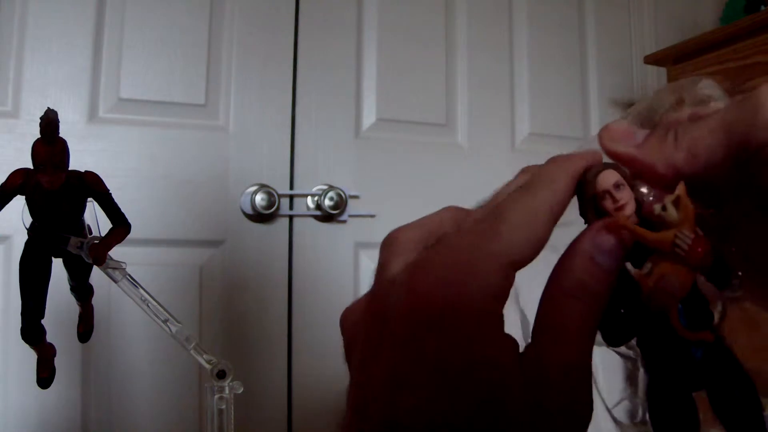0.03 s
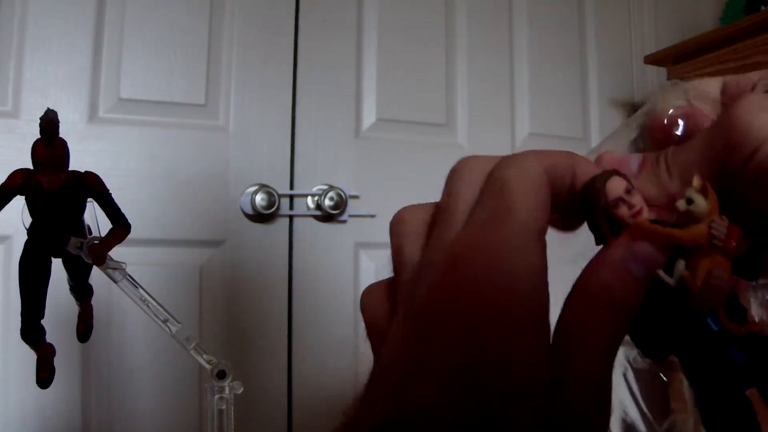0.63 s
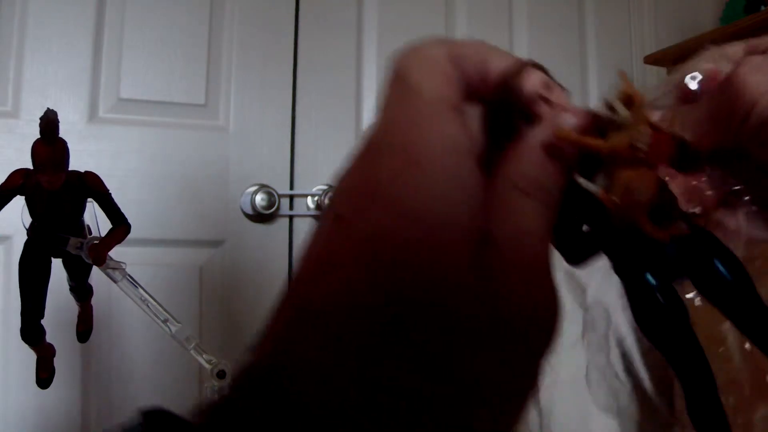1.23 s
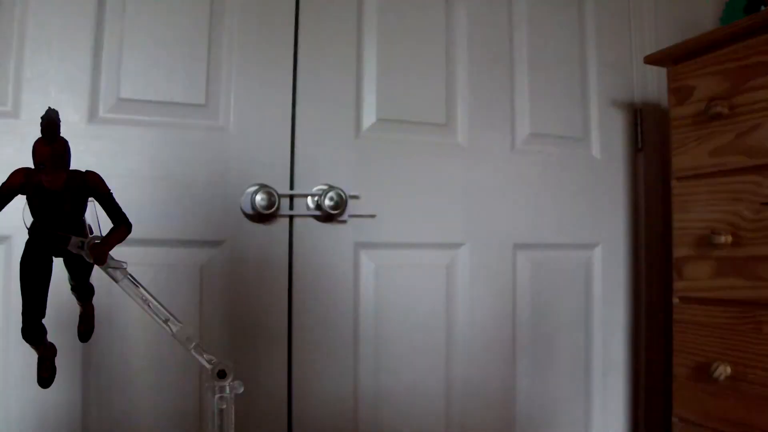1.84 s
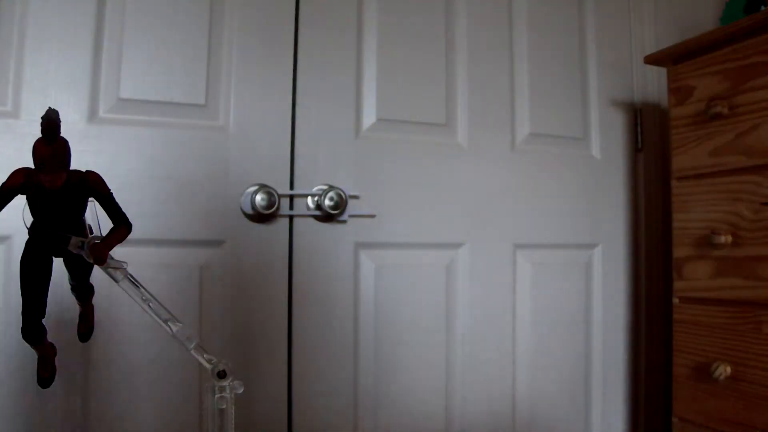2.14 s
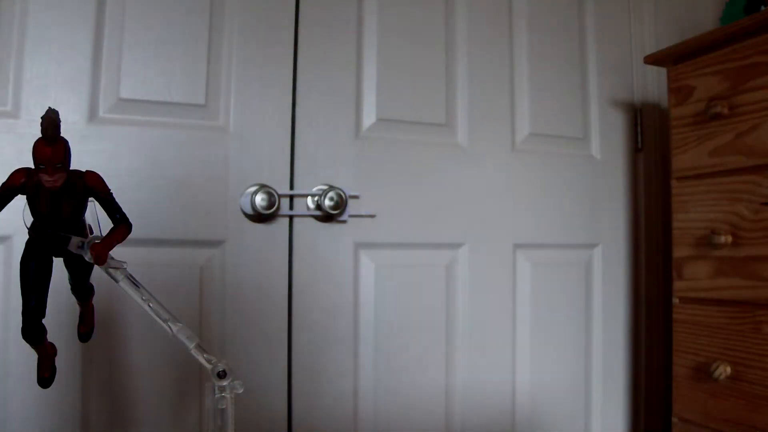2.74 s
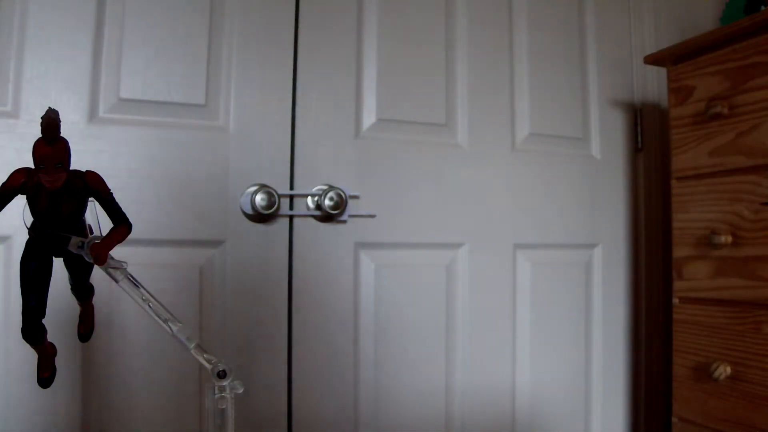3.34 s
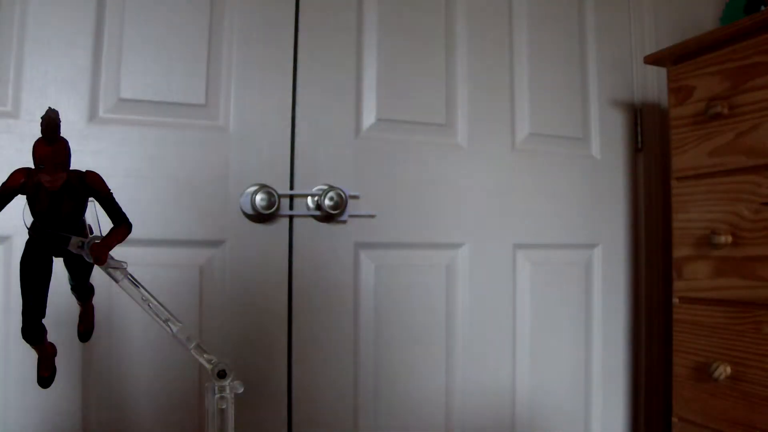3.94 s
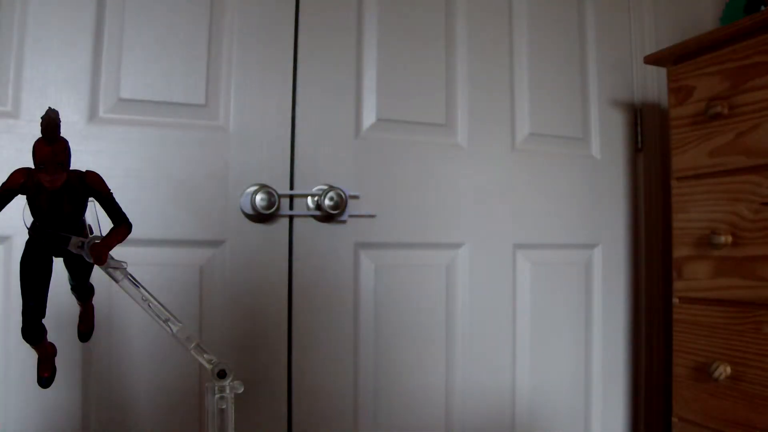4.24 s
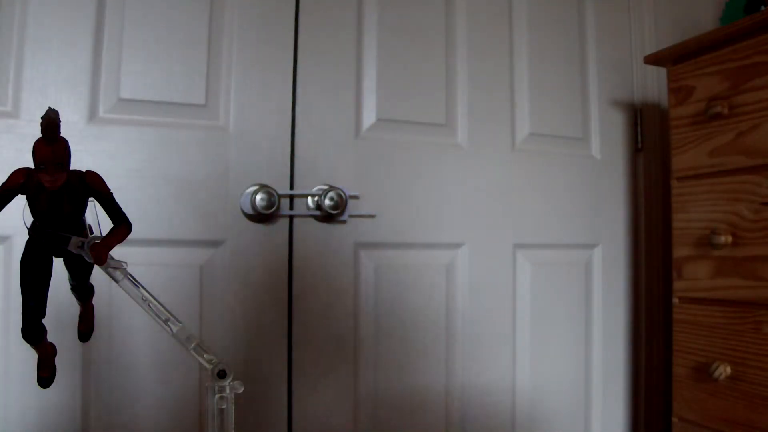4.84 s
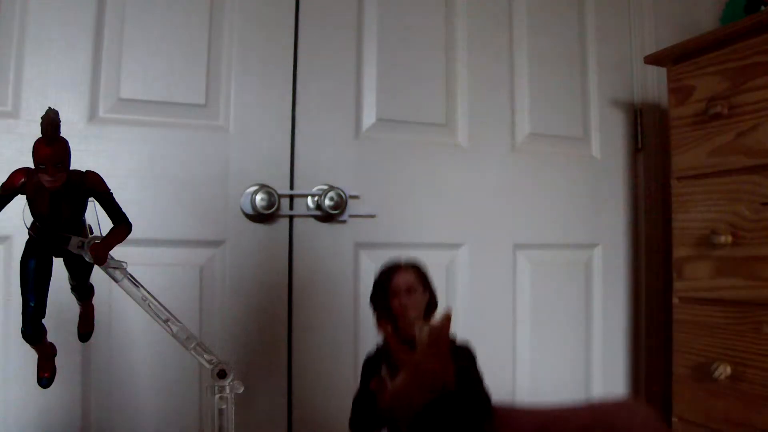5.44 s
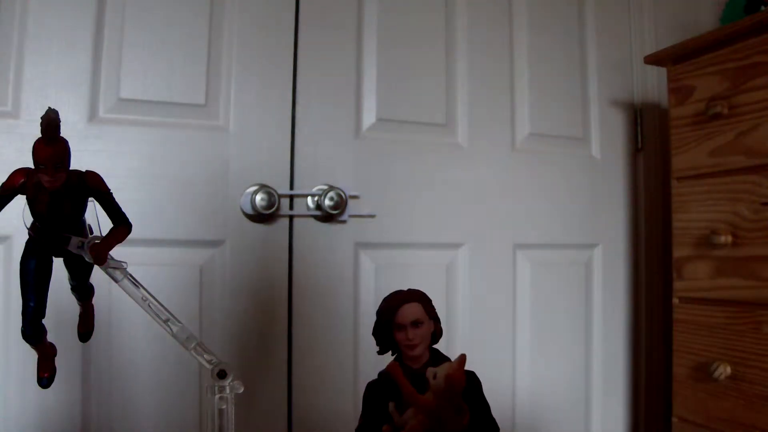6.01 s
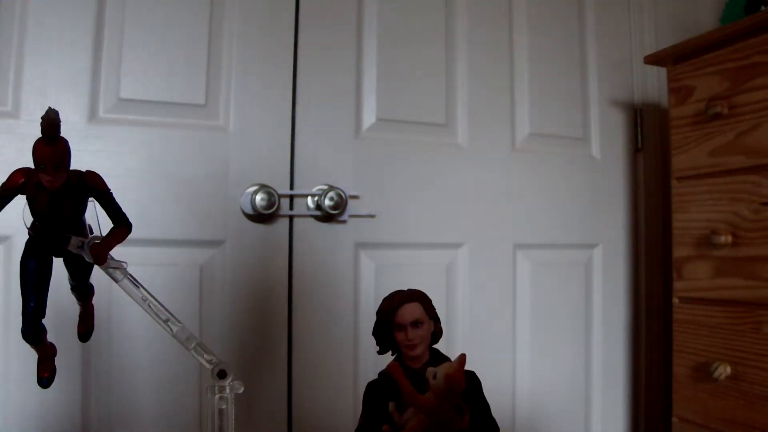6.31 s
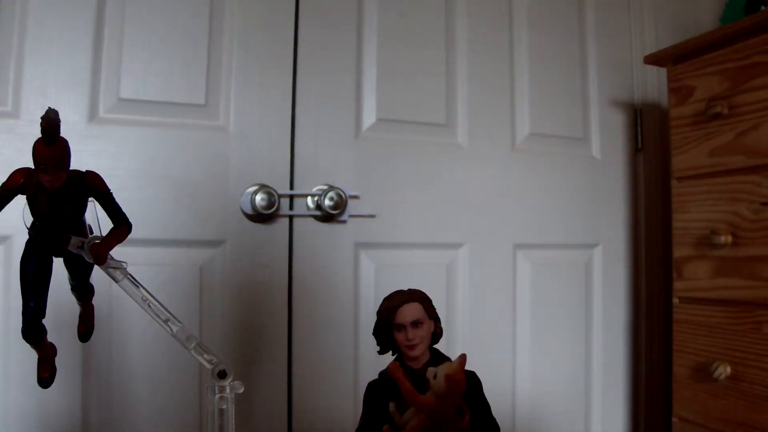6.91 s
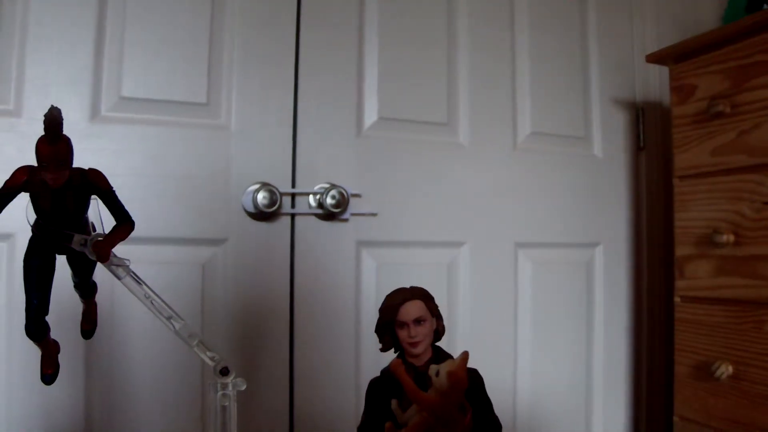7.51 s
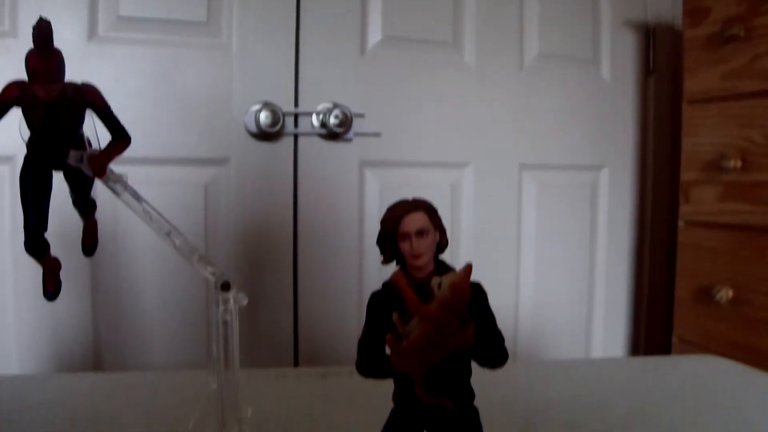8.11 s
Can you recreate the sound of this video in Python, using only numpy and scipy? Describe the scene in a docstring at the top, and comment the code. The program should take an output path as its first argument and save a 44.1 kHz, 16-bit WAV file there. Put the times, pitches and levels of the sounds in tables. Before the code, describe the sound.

In a quiet room, close handling of stiff plastic packaging makes sharp pops, crackles and rubbing that grow louder as a toy is pulled free. The empty tray pops back a few times, then drops with a brief, light clatter further away. A lull with faint hiss follows, until the toy is set on a table with one knock and settles with very soft clicks.

```python
"""A stiff plastic blister tray snaps and crinkles close by as hands work a toy figure out of it.
Each buckle launches a bending wave; dispersion brings the treble first, so it is heard as a very quick
falling chirp. The empty tray pops back a few times and clatters down further off in the quiet room.
The figure is then stood on a table with a knock, squeaks once and rocks on its feet."""
import sys
import numpy as np
from scipy import signal
from scipy.fft import rfft, irfft, next_fast_len
from scipy.io import wavfile
from scipy.ndimage import map_coordinates

SR = 44100
rng = np.random.default_rng(int(sys.argv[2]) if len(sys.argv) > 2 else 0)


def put_to_file(sound):
    """Save the sound as 16-bit audio at rate SR, in the file named by the first command-line argument."""
    columns = np.atleast_2d(sound).T  # one column per channel
    safe = np.clip(columns, -1, 1)
    whole_steps = np.round(safe * 32767)
    wavfile.write(sys.argv[1], SR, whole_steps.astype(np.int16))


N = 359856


def amp(db):
    """Amplitude ratio of a level in decibels."""
    return 10 ** (np.asarray(db) / 20)


def along(points, hz):
    """Interpolation of (Hz, value) points on a logarithmic frequency axis."""
    f, v = np.transpose(points)
    return np.interp(np.log(hz + 1), np.log(f + 1), v)


def causal(db):
    """Minimum-phase response for levels on an FFT grid, by folding the cepstrum."""
    cepstrum = irfft(np.log(amp(db) + 1e-6))
    half = len(cepstrum) // 2
    cepstrum[1:half] *= 2
    cepstrum[half + 1:] = 0
    return np.exp(rfft(cepstrum))


def add(track, s, x):
    """Superposition: x joins the track at s seconds."""
    i = int(np.clip(round(s * SR), 0, N - 1))
    track[i:i + len(x)] += x[:N - i]


def noise(spectrum):
    """White noise filtered to a spectrum of (Hz, dB) points, at rms 1."""
    gain = amp(along(spectrum, np.fft.rfftfreq(N, 1 / SR)))
    x = irfft(rfft(rng.standard_normal(N)) * gain, N)
    return x / np.sqrt(np.mean(x ** 2) + 1e-20)


def in_room(x, room_db, scatter=0, scatter_t60=.012, direct_db=0, build_s=0.0052):
    """Direct sound, early scattering from ribs and edges, and diffuse reverberation."""
    # Each row: frequency in Hz, level of the slightly boomy room in dB.
    colour = [(80, -3), (200, 3.5), (300, -0.5), (450, 0.5), (1000, 0), (5000, -1.5), (9000, 0.5),
              (14000, -4)]
    # Each row: frequency in Hz, reverberation time in seconds.
    decay = [(150, 0.41), (400, 0.36), (1000, .3), (3000, .33), (7500, 0.33), (14000, 0.26)]
    hz, t, spectra = signal.stft(rng.standard_normal(SR * 2 // 3), SR, nperseg=256)
    tail_db = along(colour, hz)[:, None] - 60 * t / along(decay, hz)[:, None]
    tail = signal.istft(spectra * amp(tail_db), SR, nperseg=256)[1]
    t = np.arange(len(tail)) / SR
    tail *= 1 - np.exp(-t / build_s)
    near = rng.standard_normal(len(t)) * amp(-60 * t / scatter_t60)
    near *= scatter / np.linalg.norm(near)
    near[0] += 1  # the direct path
    response = amp(direct_db) * near / np.linalg.norm(near) + amp(room_db) * tail / np.linalg.norm(tail)
    return signal.fftconvolve(x, response)


def strain(t, build_db_per_s=105, relax_db_per_s=79.5):
    """Loading and relaxation: the sheet's strain, in dB, builds to each swell and falls after it."""
    # Each row: time in seconds and level in dB of a swell in the crinkling and rubbing.
    # The first is a pop dying away as the sound opens; the rest are tugs of the fingers.
    swells = [(0,7.5), (.13,-6), (0.611,-2.5), (0.758,0.5), (.89,-2), (1.09,-2), (1.28,7), (1.46,11)]
    return np.max([db - np.maximum(build_db_per_s * (s - t), relax_db_per_s * (t - s))
                   for s, db in swells], axis=0)


def jolt(s, slack_db=-28):
    """Coupling, as bass in dB: a taut sheet jolts the whole tray, a slack one sounds thin."""
    return 0.21 * max(strain(s), slack_db)


def bending(hz, sweep, knee_hz=2500, piston_hz=550):
    """Dispersion: lower bending waves arrive later, but in the bass the sheet moves as one piston."""
    slowness = 1 / np.sqrt(1 + hz / knee_hz) - 1 / np.sqrt(1 + SR / 2 / knee_hz)
    delay = sweep * slowness * hz ** 2 / (hz ** 2 + piston_hz ** 2)
    return np.exp(-2j * np.pi * np.cumsum(delay) * hz[1])


def snap(db, tilt, sweep, bass_db=0, panel_hz=1000, panel_db=-99, size=4096):
    """Impulse response of the sheet: a falling chirp that swells at two well damped panel modes."""
    # Each row: frequency in Hz, level in dB common to all snaps.
    spectrum = [(40,-20), (150,-3.5), (300,-1.5), (500,0), (780,-1.5), (1000,0), (3000,1.5), (9000,-3),
                (14000,-16.5)]
    # Each row: frequency in Hz, share of bass_db that applies there.
    jolt_share = [(300,0.96), (1000,0.025)]
    hz = np.fft.rfftfreq(size, 1 / SR)
    octaves = np.log2(np.clip(hz, 850, 9000) / 3000)  # the tilt pivots about 3 kHz
    sheet = amp(along(spectrum, hz) + tilt * octaves + bass_db * along(jolt_share, hz))
    lowest, overtone = (1 / (1 + (np.log((hz + 1) / centre) / .15) ** 2)
                        for centre in (panel_hz, 1.75 * panel_hz))
    panel = amp(panel_db) * (lowest + amp(-9) * overtone)
    response = causal(20 * np.log10(np.hypot(sheet, panel))) * bending(hz, sweep)
    return amp(db) * irfft(response)[:size // 2]


def pops():
    """Snap-through buckling sets a whole panel of the tray ringing for a few cycles."""
    # Each row: start in seconds, strength in dB, tilt in dB per octave, panel mode in Hz,
    # its level in dB relative to the strength, reverberation in dB.
    buckles = [(0.001,5.5,0.4,1680,9.5,3), (0.208,-1,-7,990,7.5,-9.5), (0.4125,14,0.2,2153,4,-5),
               (0.428,12,-3,577,10,-10.5), (0.495,2,-4,2200,14.5,-12.5), (0.572,-11,-5,1880,21.5,-11.5),
               (0.8494,5.5,-2,610,7,-5.5), (1.0315,4.5,-3.5,560,8.5,-7.5), (1.062,6.5,-2.9,514,12,-16),
               (1.0721,2,1,4200,9.5,-14), (1.228,13.5,0.5,1900,7,-6.5), (1.242,19.5,-1,2040,7,-10),
               (1.296,18.5,-1,2030,9.5,-12), (1.4211,14,0.04,640,4.5,-4), (1.443,6.5,-6.5,560,19.5,-12.5),
               (1.5809,11,-6,453,17,-10), (1.767,-2.5,-3,997,12.5,-8.5), (1.8219,9,0,1800,6,-7.5),
               (1.9003,16,-1.9,890,9,-9.5), (2.1088,-16.5,-9.5,1110,17,-8.5), (2.3664,9.5,-0.8,1603,13,-5),
               (2.9283,7.5,0.5,3630,7.5,-3), (2.954,1,-4,1000,5,1)]
    out = np.zeros(N)
    for s, db, tilt, panel_hz, panel_db, room_db in buckles:
        pop = snap(db, tilt, sweep=.009, bass_db=jolt(s), panel_hz=panel_hz, panel_db=panel_db)
        add(out, s, in_room(pop, room_db, scatter=2.1, scatter_t60=0.022))
    return out


def crinkle(count=240, span_s=2.2, size=2048):
    """Acoustic emission: the sheet gives many tiny snaps, louder under greater strain."""
    out, hz = np.zeros(N), np.fft.rfftfreq(size, 1 / SR)
    for place, strength, bright, path in rng.random((count, 4)):
        s = place * span_s
        colour = [(100, -13.5), (500, -2.5), (2000, -8 + 8 * bright),
                  (8000, -22 + 20 * bright), (14000, -36 + 22 * bright)]
        echoes = rng.standard_normal(size) * amp(-60 * np.arange(size) / SR / 0.018)
        spectrum = rfft(echoes / np.linalg.norm(echoes)) * causal(along(colour, hz))
        grain = irfft(spectrum * bending(hz, sweep=0.0068 + 0.013 * path))
        add(out, s, amp(strain(s) - 21 + 20 * strength ** 2) * grain[:size // 2])
    return in_room(out, room_db=-3)[:N]


def grip(rate):
    """Stick-slip as a smooth random curve: the grip catches and lets go about rate times a second."""
    return map_coordinates(rng.standard_normal(int(N * rate / SR) + 4), [np.arange(N) * rate / SR])


def rubbing(slide_start_s=1.8, slide_end_s=2.286, edge_s=0.13):
    """Friction noise: fingers rub the hollow shell, and the figure hisses as it slides out."""
    t = np.arange(N) / SR
    shell = noise([(30, -6.5), (90, -6), (180, -8.5), (320, -10), (460, 1.5),
                   (750, -4.5), (1100, -4.5), (2500, -18.5), (9000, -41)])
    hiss = noise([(200, -20.5), (1000, 1.5), (3000, 0.5), (8000, -4.5), (13000, -11), (15000, -25)])
    shell *= amp(strain(t) - 43 + 4 * grip(110))
    sliding = np.clip(np.minimum(t - slide_start_s, slide_end_s - t) / edge_s + 1, 0, 1)
    slide = sliding * amp(-56 - 7 * (t - slide_start_s))  # fades 7 dB a second
    hiss *= np.hypot(amp(strain(t) - 47.5), slide) * amp(0.85 * grip(180))
    return shell + hiss


def background():
    """Stationary noise floor: room rumble, microphone hiss and mains hum."""
    # Each row: frequency in Hz, relative spectral density in dB.
    floor = [(20, 2), (50, 0.5), (110, -7.5), (250, -12), (500, -21.5), (1000, -24), (2000, -19),
             (3500, -28.5), (6500, -25), (9500, -35.5), (15000, -34)]
    t = np.arange(N) / SR
    hum = amp(-62) * np.sin(2 * np.pi * 120 * t)
    return amp(-56.5) * noise(floor) + hum


def creases():
    """Local buckling: small creases give way with a tick, leaving the panel modes silent."""
    # Each row: start in seconds, strength in dB, tilt in dB per octave.
    folds = [(0.1766,-12.5,-9.5), (0.2541,-15.5,0), (0.3018,-19.5,-9.5), (0.3363,-12.5,-12.5),
             (0.3651,-2.5,-0.5), (0.462,-3.4,-9.5), (0.6842,-10,-8), (0.701,-12,7.5), (0.7208,-12,-9),
             (0.7557,-4.5,-1.55), (0.7616,-0.25,-2), (0.872,-8.5,5.5), (0.8951,-8.5,-6), (1.0574,3.5,-6),
             (1.1125,-4.5,-8.5), (1.2037,-9.5,-11.5), (1.2232,2,-7), (1.2466,7.9,-3.3), (1.253,8,-5),
             (1.2842,8.5,-6.5), (1.339,-0.5,-2.5), (1.3862,-3.5,-9), (1.467,0.2,-1), (1.5346,-2,-7.5),
             (1.5708,-2,-3)]
    out = np.zeros(N)
    for s, db, tilt in folds:
        tick = snap(db, tilt, sweep=.008, bass_db=jolt(s))
        add(out, s, in_room(tick, room_db=-7.5, scatter=1.2, scatter_t60=.018))
    return out


def handling():
    """Light impacts tick on the plastic; a larger share of reverberation sounds further off."""
    # Each row: start in seconds, strength in dB, tilt in dB per octave, reverberation in dB.
    ticks = [(2.268,-19.5,-.7,-8), (2.603,-18.5,-3,0.5), (2.678,-27,-7,-11), (2.694,-23,-1.5,-1),
             (2.816,-23.5,-0.8,5), (4.274,-30,2,-7), (4.375,-39,9.5,-15), (4.8998,-27.5,9,-15),
             (5.914,-27,-2.5,0.5), (5.972,-37,-9,-6), (6.014,-27,-2,-4), (6.095,-29.5,-1.5,-2),
             (6.927,-24.5,-2.5,-2.5), (7.532,-25,-5,-20)]
    out = np.zeros(N)
    for s, db, tilt, room_db in ticks:
        add(out, s, in_room(snap(db, tilt, sweep=0.0056), room_db, scatter=1, scatter_t60=0.015))
    return out


def landing():
    """The dropped tray bounces, harder impacts brighter, and is heard mostly by reflection."""
    # Each row: start in seconds, strength in dB.
    bounces = [(3.232,-6.5), (3.244,-1), (3.255,1.5), (3.28,-3.5), (3.309,-7), (3.334,-13), (3.385,-24),
               (3.48,-14), (3.505,-9), (3.554,-20), (3.705,-14.5)]
    out = np.zeros(N)
    for s, db in bounces:
        hit = snap(db, tilt=-4 + 0.21 * db, sweep=0.0066, bass_db=-2)
        add(out, s, in_room(hit, room_db=3, scatter=2.4, scatter_t60=.05, direct_db=2, build_s=0.0062))
    return out


def whine():
    """A faint pure tone and a high band of noise sound together for about two seconds."""
    t = np.arange(N) / SR
    tone = amp(-73.5) * np.sin(2 * np.pi * 1211 * t)
    band = amp(-72.5) * noise([(4000, -24), (6400, 0), (8500, -33)])
    return (tone + band) * np.interp(t, [4.85, 4.95, 7, 7.1], [0, 1, 1, 0])


def ring(hz, t60, attack_s=0.00093, size=12000):
    """Free vibration of one damped mode, with energy 1."""
    t = np.arange(size) / SR
    mode = np.sin(2 * np.pi * hz * t) * amp(-60 * t / t60) * (1 - np.exp(-t / attack_s))
    return mode / np.linalg.norm(mode)


def table_knock(start_s=5.657):
    """Impact excitation: the figure meets the table with a click and sets its modes ringing."""
    # Each row: frequency in Hz, level in dB, 60 dB decay time in seconds.
    table_modes = [(172, -2.5, 0.056), (217.5, 5, 0.029), (310, 3.5, 0.081), (364.6, 0.5, 0.11),
                   (434, -4.5, 0.07), (727, -10.5, 0.044), (1227, -20, 0.028), (1660, -25, 0.05)]
    out = np.zeros(N)
    knock = sum(amp(db) * ring(hz, t60, attack_s=0.0044) for hz, db, t60 in table_modes)
    radiation = signal.butter(2, 90, "highpass", fs=SR, output="sos")  # a small top gives no deep bass
    add(out, start_s, amp(-6) * in_room(signal.sosfilt(radiation, knock), room_db=-11))
    contact = snap(db=-20.5, tilt=-9, sweep=0.00268, panel_hz=4940, panel_db=9)
    add(out, start_s, in_room(contact, room_db=-2.5, scatter=2.4, scatter_t60=0.026))
    return out


def squeak(start_s=6.574, length_s=0.023, start_hz=4000, end_hz=3550):
    """Friction in a slipping joint of the figure gives a brief, rough, falling note."""
    out = np.zeros(N)
    progress = np.arange(int(length_s * SR)) / (length_s * SR)
    hz = start_hz + (end_hz - start_hz) * progress + 900 * rng.standard_normal(len(progress))
    note = np.sin(2 * np.pi * np.cumsum(hz) / SR) * np.sin(np.pi * progress)
    add(out, start_s, amp(-53) * in_room(note, room_db=-16))
    return out


def rocking(spot_db_per_octave=12.5):
    """The figure settles on its feet; the point of impact decides which modes ring most."""
    # Each row: start in seconds, relative level in dB, frequency in Hz that the struck spot favours.
    taps = [(7.0359, -44, 1700), (7.1568, -55, 1700), (7.2874, -51, 1670), (7.53, -44, 2110),
            (7.69, -50, 2045), (7.8374, -50.5, 2120)]
    # Each row: frequency in Hz, level in dB, 60 dB decay time in seconds.
    figure_modes = [(1080, 6.5, 0.041), (1697, 2.5, 0.051), (2070, 4, .03), (4105, 2, 0.0072),
                    (6100, -11, 0.00592)]
    out = np.zeros(N)
    for s, db, spot_hz in taps:
        tap = 0
        for hz, mode_db, t60 in figure_modes:
            # a new spot and grip at each tap shift every mode's level and pitch a little
            level_db = mode_db - spot_db_per_octave * abs(np.log2(hz / spot_hz)) + rng.normal(0, 0.83)
            tap += amp(level_db) * ring(hz * np.exp(rng.normal(0, .025)), t60)
        add(out, s, amp(db + 14) * in_room(tap, room_db=-16))
    return out


def scene():
    """Superposition of all sources at one microphone."""
    tray = pops() + creases() + crinkle() + rubbing() + landing() + handling()
    figure = table_knock() + rocking() + squeak()
    return (tray + figure + whine() + background())[None]


def record(dry, ceiling=.74, hardness=6, top_hz=15100):
    """Resonances of the microphone port and nearby surfaces, soft saturation, then a steep low-pass."""
    # Each row: centre of a peak or dip in Hz, width in Hz, relative gain in dB.
    port = [(204, 35, 0.5), (330, 82, -0.5), (440, 62, 3), (570, 70, 1), (790, 64, -1), (1454, 140, -11),
            (1594, 150, 7), (2620, 110, -6), (2704, 150, 2), (3880, 130, 1), (4300, 200, 0), (4810, 330, 2),
            (5230, 160, 1), (6230, 270, 2), (6800, 100, -2.5), (7140, 340, 3.5), (7600, 180, -2.5),
            (8050, 210, 4.5), (8920, 260, 7)]
    size = 2 * next_fast_len(N // 2 + 8192)
    hz = np.fft.rfftfreq(size, 1 / SR)
    port_db = sum(db * np.exp(-((hz - centre) / width) ** 2) for centre, width, db in port)
    x = irfft(rfft(dry, size) * causal(port_db - 0.5))
    x /= (1 + np.abs(x / ceiling) ** hardness) ** (1 / hardness)
    return irfft(rfft(x) / np.sqrt(1 + (hz / top_hz) ** 160))[:, :N]


dry = scene()
out = record(dry)
put_to_file(out)
```